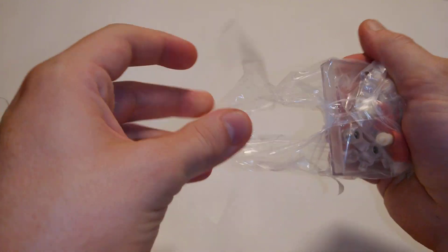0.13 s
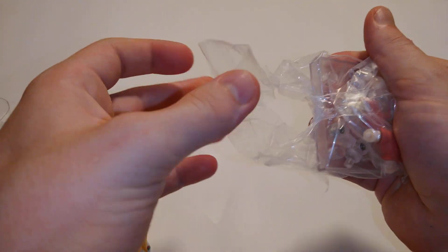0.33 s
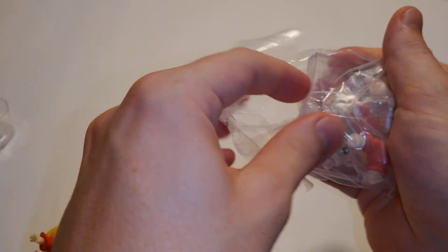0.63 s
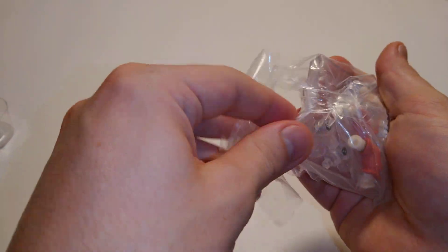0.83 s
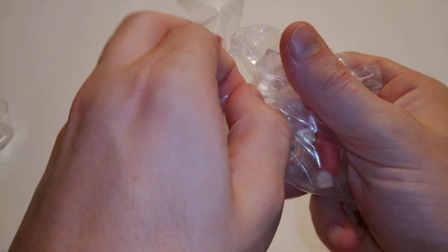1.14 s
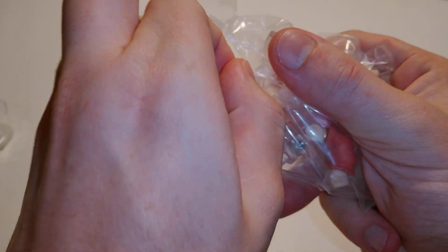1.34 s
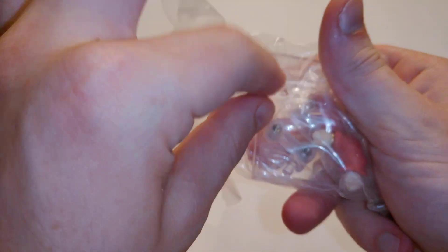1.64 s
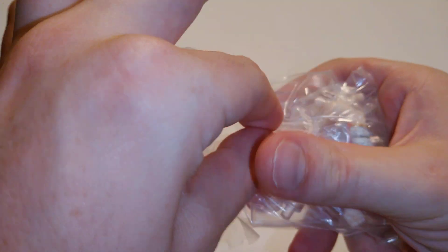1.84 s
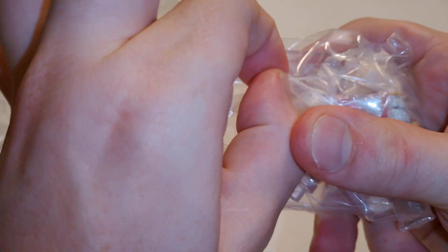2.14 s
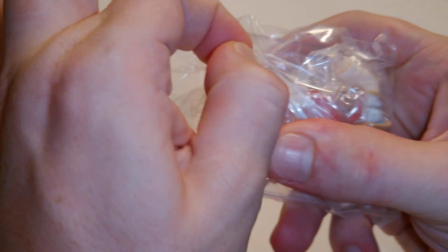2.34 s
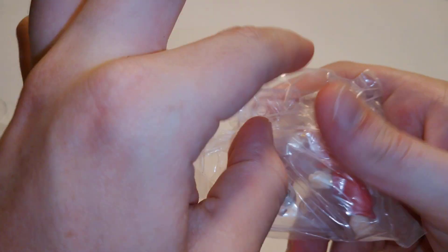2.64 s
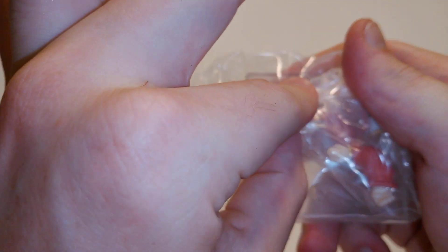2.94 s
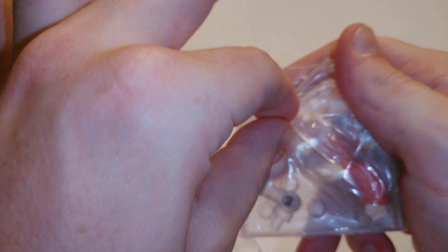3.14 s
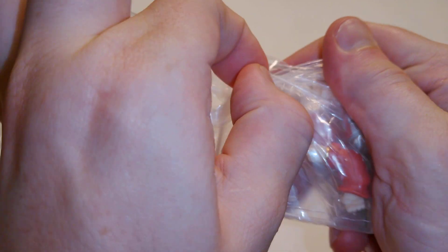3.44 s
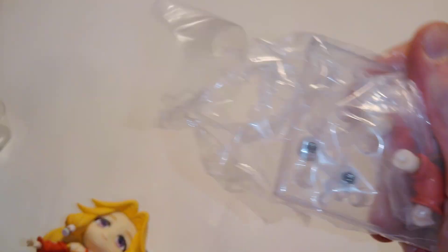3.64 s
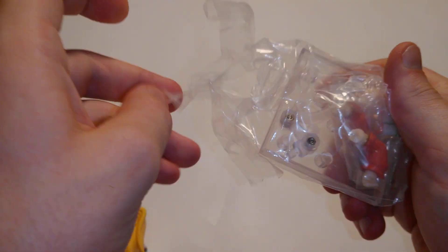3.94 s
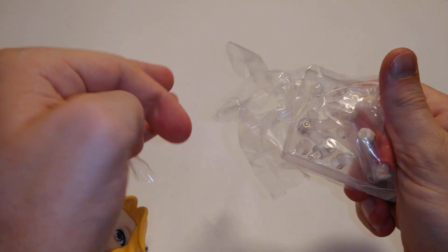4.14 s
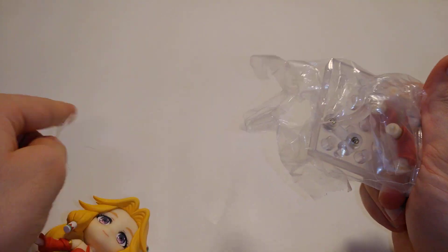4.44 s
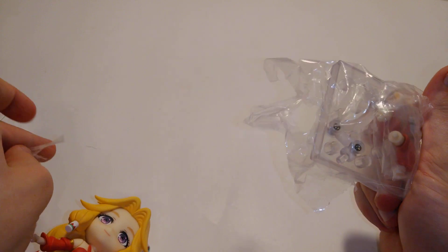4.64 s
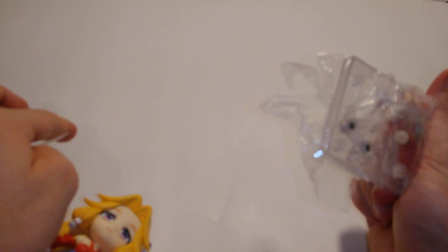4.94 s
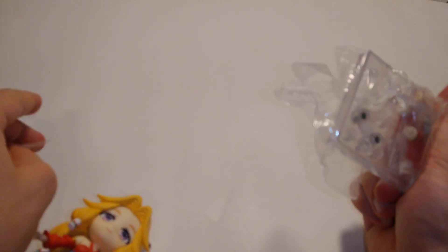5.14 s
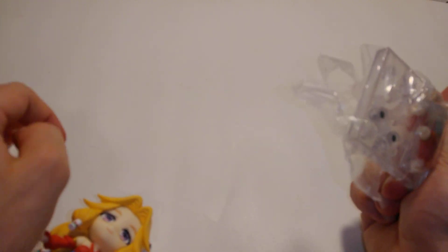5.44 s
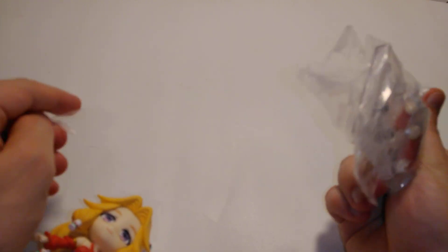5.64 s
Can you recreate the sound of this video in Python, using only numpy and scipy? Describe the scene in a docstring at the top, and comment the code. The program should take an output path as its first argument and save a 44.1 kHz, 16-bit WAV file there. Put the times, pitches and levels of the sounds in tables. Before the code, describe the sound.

Very close to a stereo microphone pair in a small quiet room, a clear plastic bag is torn open. A dense burst of loud bright snaps comes first, then near quiet, then light crinkling that thickens as fingers work the film. A second hard tug cracks sharply past the middle, followed by softer crackles thinning to occasional ticks over faint room noise.

```python
"""In a small room, close to a pair of microphones above a table, two hands pull open a clear plastic bag with a toy
figure in it. Creases buckle in sharp snaps: a pulse and scattered noise, filtered to ring each one's patch of film.
Between them the sheet crumples in swarms of tiny random clicks, loudest in two hard tugs. Resonant noise bursts are
the fingers knocking the stiff packet. A decaying noise tail is the room, over faint steady noise and a thin hum."""
import sys
import numpy as np
from scipy import signal
from scipy.fft import rfft, irfft, next_fast_len
from scipy.io import wavfile
from scipy.ndimage import map_coordinates

SR = 44100
rng = np.random.default_rng(int(sys.argv[2]) if len(sys.argv) > 2 else 0)


def wrap_up_sound(samples):
    """Save the sound to the file named by the first command line argument, as 16-bit audio."""
    columns = np.atleast_2d(samples).T
    # keep every value between -1 and 1, then stretch to whole-number steps
    tamed = np.clip(columns, -1, 1)
    steps = np.round(tamed * 32767).astype(np.int16)
    wavfile.write(sys.argv[1], SR, steps)


N = 255780

# colour of a crack in thin film: pitch_hz [Hz], level_db [dB]
FILM_COLOUR = [(700, -59.5), (2400, -19), (3500, -4), (6500, -0.5), (7800, 2.5), (9000, -1), (10500, -0.5),
               (12500, -5.5), (15000, -9.5), (16000, -22.5)]
# colour of a finger-wide patch of film: pitch_hz [Hz], level_db [dB]
PATCH_COLOUR = [(170, -49), (560, -15), (830, -2), (1300, -2), (1750, -0.5), (2050, -3), (2400, -0.5),
                (2900, -3.5), (6000, -8)]
# colour of the flexing packet: pitch_hz [Hz], level_db [dB]
PACKET_COLOUR = [(45, -33), (215, -12.5), (360, 0), (600, -6.5), (780, -1.5), (1500, -41.5)]


def undb(db):
    """Decibels to gain."""
    return 10 ** (np.asarray(db) / 20)


def unit(x):
    """Scale to an average energy of one per channel."""
    return x / np.sqrt(np.sum(x ** 2) / len(x))


def curve_db(points, size):
    """A (Hz, dB) table interpolated over log frequency onto the bins of a transform."""
    hz, db = np.transpose(points)
    bin_hz = np.arange(size // 2 + 1) * SR / size
    return np.interp(np.log(bin_hz + 1), np.log(hz), db)


def colour(x, points):
    """Causal minimum-phase filter with the given (Hz, dB) shape, made by folding its cepstrum."""
    size = next_fast_len(2 * x.shape[-1]) * 2
    cepstrum = irfft(np.log(undb(curve_db(points, size))))
    cepstrum[1:size // 2] *= 2
    cepstrum[size // 2 + 1:] = 0
    response = np.exp(rfft(cepstrum))
    return irfft(rfft(x, size) * response)[..., :x.shape[-1]]


def resonate(x, hz, q):
    """One damped resonance."""
    return signal.lfilter(*signal.iirpeak(hz, max(q, 1), fs=SR), x)


def add(out, start_s, sound):
    """Mix a sound in at a time."""
    start = max(int(start_s * SR), 0)
    part = sound[:, :max(N - start, 0)]
    out[:, start:start + part.shape[1]] += part


def snaps():
    """Each snap is a bright crack, the short ring of its patch of film and a shove on the packet."""
    # creases that snap through: start_s [s], crack_db [dB], ring_db [dB], ring_hz [Hz]
    snap_table = [(0.0178,-17,-26.5,2210), (0.0217,-19.5,-24.5,914), (.03,-15,-31.5,2140),
                  (.036,-8,-23,1060), (0.0487,-16.5,-24,2440), (.061,-15.5,-23,2850), (.082,-13.5,-23,2434),
                  (0.1277,-15,-26.5,2240), (0.2496,-37.5,-52.5,2300), (.327,-40,-53.5,2970),
                  (0.3574,-41.5,-80,3200), (0.4292,-37,-59,2260), (0.4753,-36,-51,2280),
                  (0.5125,-34,-60,1420), (0.715,-36.5,-58,1530), (.7225,-37,-59,1990),
                  (.734,-31.5,-57,2350), (0.7972,-39,-53,2600), (0.803,-33.5,-58,3060),
                  (0.817,-31.5,-54,1970), (0.8842,-29,-55,2750), (.894,-32,-41.5,2430),
                  (.8995,-42,-53,2500), (0.9058,-33,-50,2500), (0.9838,-38.5,-52,2450),
                  (1.0158,-36.5,-42.5,1880), (1.0273,-35,-40,2560), (1.0486,-43,-49,3140),
                  (1.079,-32,-55,1470), (1.12,-49,-38,2300), (1.1305,-25.5,-65,3140), (1.157,-31,-52,1820),
                  (1.2045,-26.5,-38.5,1690), (1.2327,-36,-52,2910), (1.287,-28.5,-50,1490),
                  (1.3021,-29.5,-39,1680), (1.3287,-33,-60,1870), (1.3572,-33.5,-68,2330),
                  (1.4204,-32,-46.5,2040), (1.483,-42,-52,1800), (1.4946,-39,-59,2430),
                  (1.51,-33.5,-42.5,1820), (1.537,-31.5,-61,2760), (1.559,-36,-49,2000),
                  (1.5727,-30,-55,2500), (1.5857,-34,-44,2260), (1.601,-26,-39,2200),
                  (1.6211,-46,-37.5,2250), (1.7299,-41.5,-53,2750), (1.8102,-36,-42.5,2560),
                  (1.8423,-31,-41,1730), (1.8694,-63,-40,1110), (1.928,-39,-58,2420),
                  (1.935,-35.5,-53,2400), (1.941,-41,-49,1410), (1.966,-45,-48,1450),
                  (1.9821,-35.5,-42.5,2500), (2.008,-36.5,-38.5,2330), (2.0663,-32.5,-43.5,1450),
                  (2.1122,-45,-36,2950), (2.1156,-30.5,-37,1450), (2.1394,-39,-38.5,3040),
                  (2.1506,-37,-39.5,1250), (2.1774,-35,-42,2980), (2.2093,-36.5,-52,2400),
                  (2.2225,-30,-42,2260), (2.2407,-28,-41.5,2570), (2.283,-36,-46,2760),
                  (2.3024,-35,-44,2520), (2.3525,-37,-37.5,2200), (2.3787,-26.5,-31.5,2620),
                  (2.4331,-37,-45,2560), (2.453,-40,-64,2830), (2.613,-33.5,-36,2250), (2.628,-43,-36,3530),
                  (2.6566,-36.5,-41,2320), (2.693,-40,-44,1840), (2.7153,-38.5,-45,2000),
                  (2.7281,-35.5,-40,2330), (2.7396,-34,-42.5,1700), (2.777,-34,-42,2300),
                  (2.782,-31,-35,2680), (2.814,-35,-45,2970), (2.82,-29,-56,2000), (2.835,-39.5,-41,2500),
                  (2.909,-42,-52,2450), (2.929,-33.5,-42,1490), (2.96,-41,-42.5,2380),
                  (2.9845,-33,-39.5,2380), (3.044,-33,-38,1980), (3.099,-36,-49,1720),
                  (3.1117,-35,-43,3020), (3.1645,-39,-49.5,1760), (3.1743,-44,-47,1990),
                  (3.2092,-32.5,-39,1685), (3.2327,-26.5,-39,2660), (3.2529,-34,-41.5,2090),
                  (3.272,-37,-64.5,2620), (3.3116,-31.5,-42,1580), (3.3249,-32.5,-41.5,1046),
                  (3.364,-35.5,-60.5,2124), (3.388,-29,-36.5,1970), (3.4218,-38.5,-53.5,2234),
                  (3.4334,-33,-47,2200), (3.44,-33.5,-46,1850), (3.497,-38.5,-48.5,1420),
                  (3.5162,-42.5,-55,2033), (3.534,-40.5,-48.5,2540), (3.6189,-24.5,-28,3060),
                  (3.6238,-14.5,-20,2740), (3.6607,-12.5,-16,1496), (3.677,-13.5,-28.5,2035),
                  (3.829,-41.5,-48,2380), (3.871,-44.5,-50.5,2320), (3.891,-40,-50,1980),
                  (3.9104,-39,-44.5,2300), (3.988,-67,-46.5,1700), (4.0521,-51,-43,1700),
                  (4.0787,-48.5,-36,1980), (4.1576,-38.5,-47,1540), (4.187,-37,-50,3250),
                  (4.2125,-36,-49,2410), (4.2488,-40,-50,2170), (4.2828,-35,-42,1910),
                  (4.2929,-39,-42,2200), (4.3002,-32.5,-42,3120), (4.326,-36,-42,2380),
                  (4.3522,-40,-52,2500), (4.3702,-37,-57,2910), (4.4,-35.5,-48,2520), (4.4225,-31,-40,2720),
                  (4.501,-50,-55.5,2190), (4.575,-45.5,-49,2600), (4.7,-41.5,-49,2870),
                  (4.7665,-34,-43,1960), (4.7722,-45,-53,1890), (4.801,-38,-55,2490), (4.8251,-43,-41,2900),
                  (4.8642,-34.5,-44,2670), (4.8744,-34,-59,2400), (4.8874,-35.5,-45,1970),
                  (4.9336,-35.5,-41,3160), (4.9746,-37.5,-58,2900), (4.9945,-43,-49,2430),
                  (5.0247,-41.5,-46.5,2600), (5.083,-50.5,-57,3400), (5.182,-50.5,-54.5,1940),
                  (5.303,-46,-62,1700), (5.4088,-32.5,-39,2480), (5.459,-43.5,-48.5,2580),
                  (5.4787,-45.5,-53,1920), (5.591,-53.5,-64,2480), (5.6257,-61.5,-60,3430),
                  (5.783,-52.5,-81.5,2690)]
    packet_db, thud_db = -23.5, -12.5  # shove relative to the ring; raw push relative to the resonance
    pan_spread_db, lag_spread_s = 2.5, .00005
    creak_db, creak_s = -19.0, .0031  # early steps: level relative to the crack, longest lead
    # a patch that rings louder than it cracks is stiff and rings more narrowly
    equal_q, q_slope, top_q = 1.6, .55, 2
    level_scale = np.sqrt(.005 * SR)  # levels are RMS over 5 ms
    out = np.zeros((2, N))
    for start_s, crack_db, ring_db, ring_hz in snap_table:
        pan_db = pan_spread_db * rng.standard_normal()
        bright = buckle(flutter_s=.0023, flutter_db=4.5, apart=.45)
        bright = unit(colour(glint(bright, q=14.0, gain_db=1.0), FILM_COLOUR))

        push = buckle(flutter_s=.0022, flutter_db=3.0, apart=.95)
        q = min(equal_q * undb(q_slope * (ring_db - crack_db)), top_q)
        ringing = resonate(resonate(push, ring_hz, q), ring_hz, q)
        patch = unit(colour(ringing + undb(thud_db) * push, PATCH_COLOUR))
        packet = unit(colour(push, PACKET_COLOUR))

        sound = undb(crack_db) * bright + undb(ring_db) * (patch + undb(packet_db) * packet)
        sound = sound * undb(np.array([[pan_db], [-pan_db]]) / 2) * level_scale
        sound = place(sound, lag_spread_s * rng.standard_normal())
        add(out, start_s, sound)
        # the crease gives in small steps just before it flips
        for early in rng.random(size=2):
            step = unit(colour(buckle(flutter_s=.0028, flutter_db=8.5, apart=1.0), FILM_COLOUR))
            add(out, start_s - creak_s * early, step * undb(crack_db + creak_db) * level_scale)
    return out


def buckle(flutter_s, flutter_db, apart, size=1024):
    """A crease flips: one pulse, then waves scatter through the film and reach the two ports differently."""
    t = np.arange(size) / SR
    noise = rng.standard_normal((3, size)) * np.exp(-t / flutter_s)
    sound = undb(flutter_db) * unit(noise[0] + apart * noise[1:])  # common part plus each port's own
    sound[:, 0] += rng.choice([-1, 1])
    return sound


def glint(x, q, gain_db):
    """Every crease is shaped differently and favours four treble pitches of its own."""
    pitches_hz = rng.uniform(3000, 14000, size=4)
    return x + undb(gain_db) * sum(resonate(x, hz, q) for hz in pitches_hz)


def place(sound, lag_s):
    """A crease off to one side reaches the far port a little later."""
    lag = int(round(lag_s * SR))
    ears = []
    for ear, delay in zip(sound, (lag, -lag)):
        before = max(delay, 0)
        ears.append(np.pad(ear, (before, abs(lag) - before)))
    return np.array(ears)


def crumple():
    """Fine creases crackle on top, the packet flexes below, and the patches between follow both."""
    # squeezes of the fingers, light shifts to hard tugs, each a burst of crinkling:
    # start_s [s], held_s [s], crackle_db of the film [dB], flex_db of the packet [dB]
    squeeze_table = [(0,0.054,-17.5,-58), (.25,0.28,-59.5,-96.5), (.435,0.073,-50,-79),
                     (.505,0.01,-39.5,-66), (.674,0.041,-48.5,-73), (.714,0.019,-42.5,-63.5),
                     (.79,.061,-48.5,-66.5), (.883,0.061,-47.5,-72), (.986,.11,-43.5,-63),
                     (1.12,0.2,-41,-60), (1.178,0.03,-35.5,-56.5), (1.345,0.065,-62.5,-68.5),
                     (1.46,.05,-44,-69), (1.58,0.075,-39.5,-60), (1.68,0.12,-63.5,-74), (1.82,0.08,-52,-67),
                     (1.925,0.059,-55,-77.5), (2.108,0.16,-48.5,-79), (2.372,0.028,-39,-76.5),
                     (2.545,.13,-62.5,-72.5), (2.612,.25,-51,-63), (2.73,.1,-43,-66),
                     (2.87,0.014,-63,-64.5), (2.974,0.011,-41,-60.5), (3.098,0.021,-45,-62),
                     (3.222,0.02,-37.5,-62), (3.32,.14,-51.5,-69), (3.495,0.066,-49,-77.5),
                     (3.618,0.025,-29,-60.5), (3.66,0.0086,-29,-41), (3.912,.08,-46,-70),
                     (4.09,0.11,-56.5,-84.5), (4.19,0.076,-46,-72.5), (4.278,0.077,-44,-67.5),
                     (4.365,0.048,-53.5,-68), (4.46,0.34,-59,-84.5), (4.7,0.37,-53,-78),
                     (5.244,0.028,-51,-90), (5.29,0.23,-57,-84.5), (5.392,0.031,-45.5,-69),
                     (5.59,0.25,-67.5,-104)]
    patch_db, stiff_share = 7.0, .38  # added to the patches; how far they follow the flexing
    body_hz, body_q, body_db = 380, 6.3, -12.5  # the stiff packet's main resonance, rung as it flexes
    crackle_db, flex_db = grip(squeeze_table)
    between_db = crackle_db + stiff_share * (flex_db - crackle_db) + patch_db
    fine = swarm(crackle_db, FILM_COLOUR, rate=130., scatter_db=4, flutter_s=.0014, apart=.6)
    middle = swarm(between_db, PATCH_COLOUR, rate=260., scatter_db=7.0, flutter_s=.0017, apart=.44)
    wide = swarm(flex_db, PACKET_COLOUR, rate=370., scatter_db=15.5, flutter_s=.00073, apart=.18)
    body = undb(body_db) * resonate(wide, body_hz, body_q)
    return fine + middle + wide + body


def grip(rows):
    """Crackle and flexing levels in dB: each squeeze builds quickly, eases while held and dies as film settles."""
    grip_s, ease_db_per_s, settle_s = .0016, 12, .017
    t = np.arange(N) / SR
    power = np.full((2, N), 1e-12)  # keeps the logarithm finite
    for start_s, held_s, crackle_db, flex_db in rows:
        age_s = np.maximum(t - start_s, 0)
        attack = np.minimum(age_s / grip_s, 1)
        sag = undb(-ease_db_per_s * age_s)
        release = np.exp(-np.maximum(age_s - held_s, 0) / settle_s)
        power += (undb([[crackle_db], [flex_db]]) * attack * sag * release) ** 2
    return 10 * np.log10(power)


def swarm(level_db, shape, rate, scatter_db, flutter_s, apart, facets=14):
    """Tiny buckles of many facets; harder working makes them denser, and each facet has its own timbre."""
    out = np.zeros((2, N))
    # rate is clicks per second at the median level
    clicks_per_s = rate * undb(.6 * (level_db - np.median(level_db)))
    density = np.clip(clicks_per_s, rate / 3, SR / 10) / SR  # chance of a click per sample
    for _ in range(facets):
        fired = rng.random(N) < density / facets
        size = undb(scatter_db * np.clip(rng.standard_normal(N), -2, 2))
        # dividing by density keeps the level independent of how many clicks fire
        clicks = fired * size / np.sqrt(np.mean(size ** 2) * density)
        clicks = clicks * undb(level_db) * rng.choice([-1, 1], N)
        facet = glint(buckle(flutter_s, 0, apart), q=34.0, gain_db=9.5)
        facet = place(unit(colour(facet, shape)), .00006 * rng.standard_normal())
        out += signal.oaconvolve(clicks[None], facet, axes=1)[:, :N]
    return out


def jolts():
    """Dull knocks; the softer the contact, the lower and longer the thud."""
    # jolts of the hands and packet: start_s [s], level_db [dB], pitch_hz [Hz]
    jolt_table = [(0.035, -55, 100), (0.085, -50, 82), (0.13, -44.5, 397), (0.258, -58, 83),
                  (0.51, -55.5, 288), (1.016, -52.5, 378), (1.204, -47, 300), (1.637, -59, 340),
                  (1.843, -55, 364), (2.656, -56.5, 380), (2.749, -52, 280), (2.927, -55, 386),
                  (3.661, -42.5, 103), (3.676, -42.5, 183), (4.251, -59.5, 370), (4.3, -57, 354),
                  (4.423, -60, 377), (4.767, -51.5, 456)]
    cycles, q = .91, 1.5  # decay time in cycles of the pitch; sharpness of the resonance
    level_scale = np.sqrt(.0076 * SR)  # levels are RMS over 7.6 ms
    out = np.zeros((2, N))
    for start_s, level_db, pitch_hz in jolt_table:
        knock = buckle(flutter_s=cycles / pitch_hz, flutter_db=-3, apart=.37, size=4096)
        knock = unit(resonate(resonate(knock, pitch_hz, q), pitch_hz, q))
        add(out, start_s, knock * undb(level_db) * level_scale)
    return out


def hold(x):
    """The bag moves across the microphone pair, which shifts arrival time and level between the ports."""
    # where the bag is held: start_s [s], left_lag_s [s], left_minus_right_db [dB]
    position = [(0, .00005, 0.5), (2.501, .00012, -1.5), (3.6, .00008, -2.5), (5.0, -.00006, 1)]
    point_s, *columns = np.transpose(position)
    samples = np.arange(N)
    lag_s, pan_db = (np.interp(samples / SR, point_s, column) for column in columns)
    ears = []
    for ear, side in zip(x, (.5, -.5)):
        delayed = map_coordinates(ear, [samples - side * lag_s * SR], order=3)
        ears.append(delayed * undb(side * pan_db))
    return np.array(ears)


def room(x):
    """Diffuse tail of a small room; the table and walls answer after a few milliseconds."""
    t60_s, onset_s, gain_db = .28, .004, -8.5
    t = np.arange(SR // 2) / SR
    decay = np.exp(-np.log(1000) * t / t60_s)
    tail = rng.standard_normal((2, len(t))) * decay * np.clip(t / onset_s, 0, 1) ** 2
    # long waves arrive alike at both ports
    side = colour(tail[1], [(400, -11.0), (2000, 6.5)])
    tail = unit(np.array([tail[0] + side, tail[0] - side]))
    tail = colour(tail, [(200, 8.0), (3500, 0), (8000, -1.5), (15000, -3.0)])
    return undb(gain_db) * signal.oaconvolve(x, tail, axes=1)[:, :N]


def air():
    """Faint steady noise, partly shared by the ports, with a thin sine hum."""
    # colour of the quiet room: pitch_hz [Hz], level_db [dB]
    air_colour = [(25, -10), (110, -3.5), (560, -19.5), (16000, -21.5)]
    noise_db, hum_hz, hum_db = -77.5, 300, -91  # RMS levels
    hum = undb(hum_db) * np.sqrt(2) * np.sin(2 * np.pi * hum_hz * np.arange(N) / SR)
    noise = rng.standard_normal((3, N))
    noise = unit(colour(noise[0] + .59 * noise[1:], air_colour)) * np.sqrt(N)
    return noise * undb(noise_db) + hum


def scene():
    """The bag, its room and the quiet behind them."""
    bag = hold(snaps() + crumple() + jolts())
    return bag + room(bag) + air()


def record(dry):
    """The two ports colour the treble differently; the loudest peaks are rounded and the top is cut."""
    # left minus right of the microphone pair: pitch_hz [Hz], difference_db [dB]
    ports = [(2000, 0.5), (5500, -2.5), (9000, 0), (13500, 8)]
    ceiling, top_hz = .52, 16000
    tilt_db = curve_db(ports, N) / 2
    heard = irfft(rfft(dry) * undb(np.array([tilt_db, -tilt_db])), N)
    heard = ceiling * np.tanh(heard / ceiling)
    low_pass = signal.ellip(8, .2, 70, top_hz, fs=SR, output="sos")
    return signal.sosfilt(low_pass, heard)


dry = scene()
out = record(dry)
wrap_up_sound(out)
```